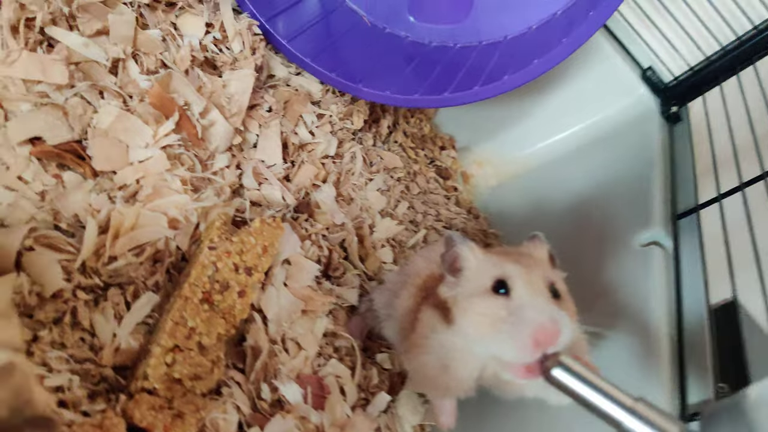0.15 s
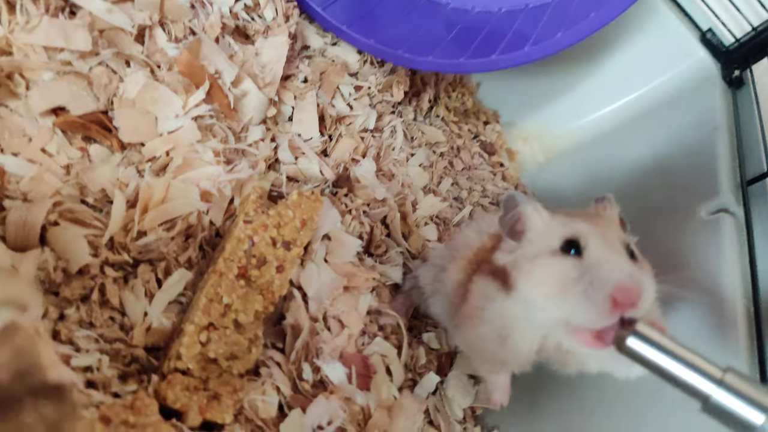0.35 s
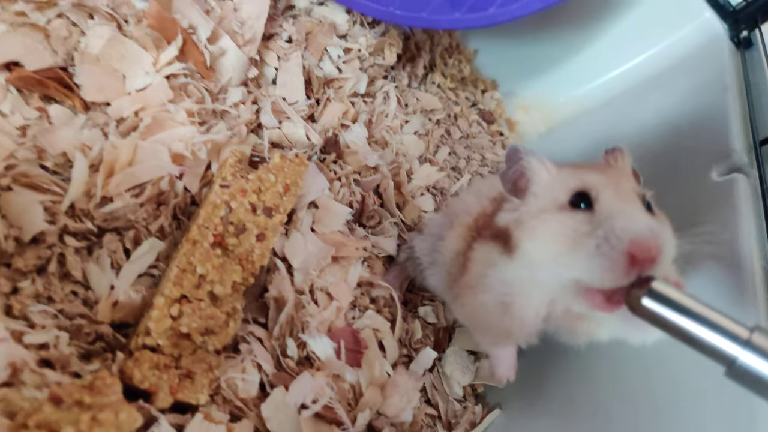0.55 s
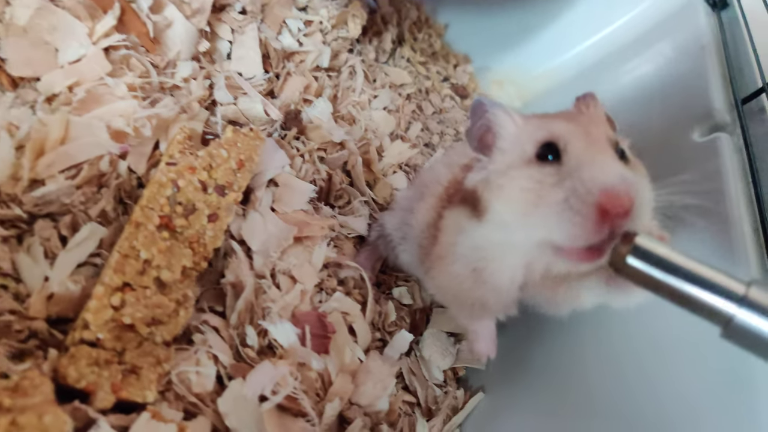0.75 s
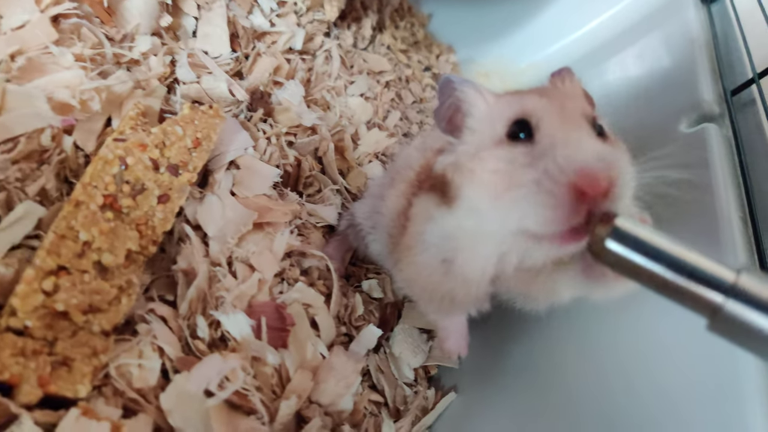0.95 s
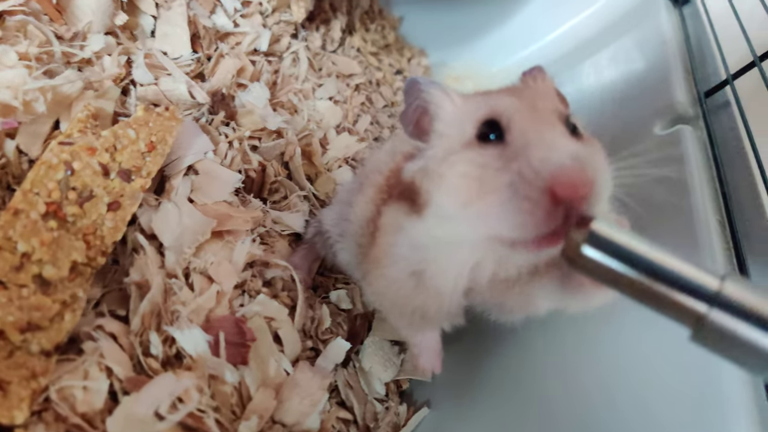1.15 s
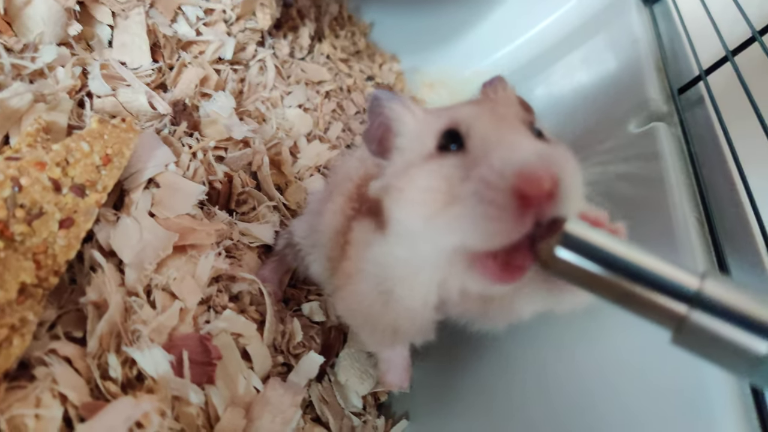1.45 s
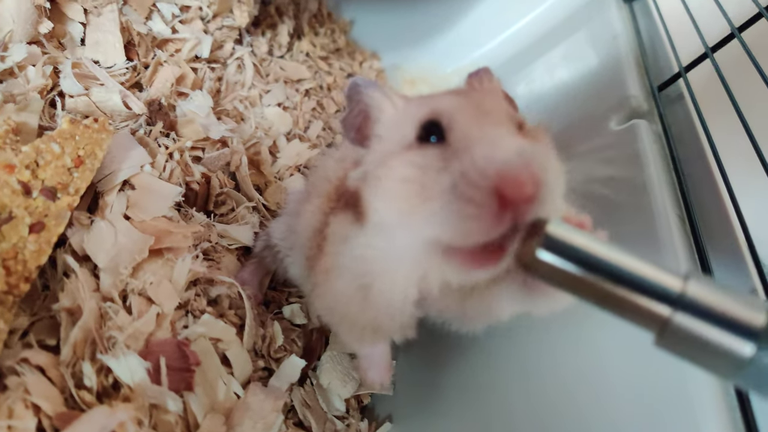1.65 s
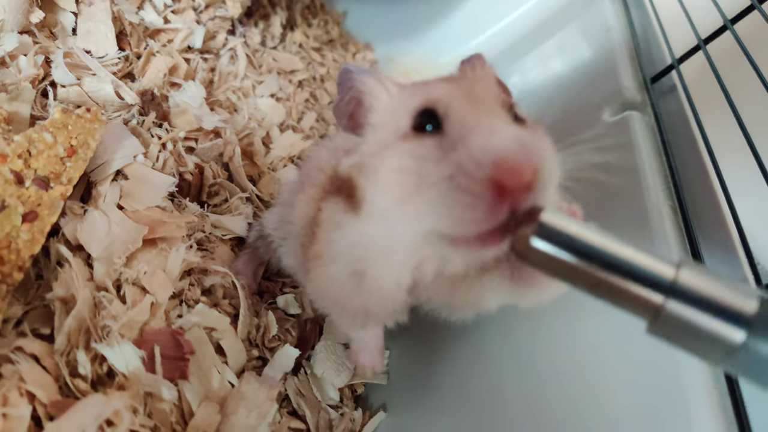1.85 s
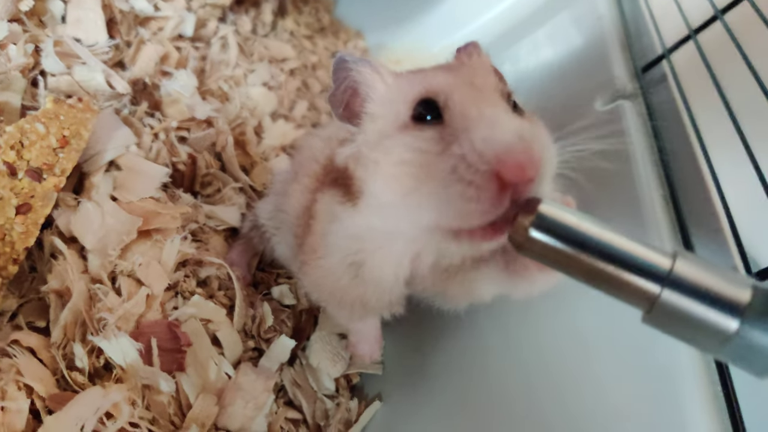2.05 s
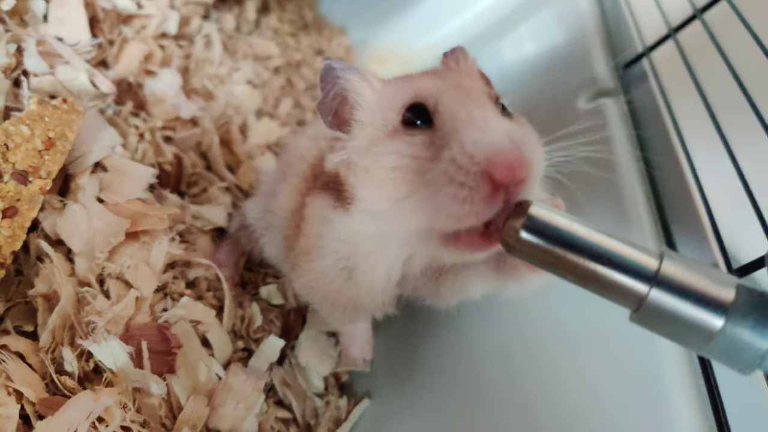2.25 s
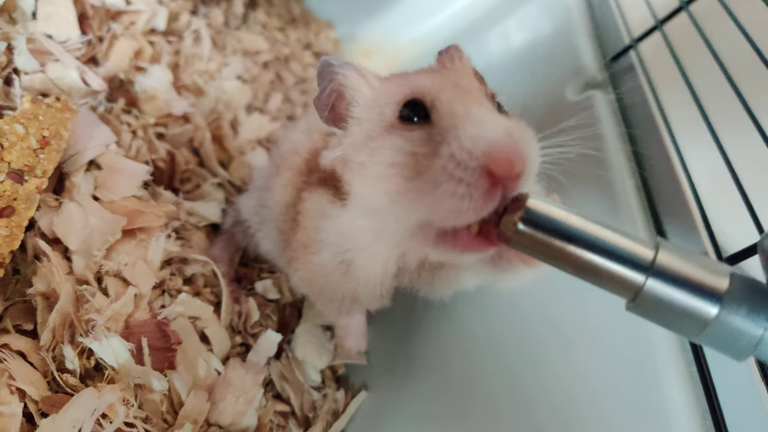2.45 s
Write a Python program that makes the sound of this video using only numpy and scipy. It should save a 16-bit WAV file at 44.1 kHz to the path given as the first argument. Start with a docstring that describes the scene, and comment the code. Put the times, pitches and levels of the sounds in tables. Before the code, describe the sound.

A hamster's steel water spout clicks twice in quick succession after a soft hiss and low handling rumble; faint bedding rustles and small wet snaps follow, heard close up in a quiet room.

```python
"""A hamster drinks from the steel spout of a bottle in its cage, close to a hand-held camera in a quiet room.
After a near-silent instant, filtered room noise with faint hums fades in; a soft noise hiss swells, peaking
near 0.5 s, over a push of air and hand rumble. Faint grain rustles and noise-burst knocks come and go.
Near 1.5 s the spout clacks twice: a noise crack, decaying sine modes of spout and cage, a rattle and a bar ring.
Small wet ticks, each a dying noise burst, follow near 1.9 s and later, among more rustles."""
import sys
import numpy as np
from scipy import signal
from scipy.fft import rfft, irfft
from scipy.io import wavfile
from scipy.ndimage import uniform_filter1d

SR = 44100
rng = np.random.default_rng(int(sys.argv[2]) if len(sys.argv) > 2 else 0)


def file_out(sig):
    """Save sig as 16-bit WAV at sys.argv[1]."""
    # one column per channel
    cols = np.atleast_2d(sig).T
    # limit, then scale
    lim = np.clip(cols, -1, 1)
    pcm = np.round(lim * 32767).astype(np.int16)
    wavfile.write(sys.argv[1], SR, pcm)


N = 114660
T, HZ = np.arange(N) / SR, np.fft.rfftfreq(N, 1 / SR)
T_HIT = T[:SR]  # 1 s for each struck sound

# In all tables left_minus_right_db > 0 is louder on the left; density_db is relative, per Hz.


def amp(db):
    """Decibels to gain."""
    return 10 ** (np.asarray(db) / 20)


def unit(x):
    """Scales to rms 1."""
    return x / np.sqrt(np.mean(x ** 2) + 1e-20)


def read(points, hz, axis=1):
    """Interpolates one table column along log frequency."""
    p = np.transpose(points)
    return np.interp(np.log(hz + 1), np.log(p[0] + 1), p[axis])


def level(points):
    """Gain over time from (time_s, level_db) points."""
    return amp(np.interp(T, *np.transpose(points)))


def sides(left_minus_right_db):
    """Left and right gains, of mean 1, for a level difference."""
    gains = amp([[left_minus_right_db / 2], [-left_minus_right_db / 2]])
    return gains / gains.mean()


def add(mix, start_s, sound):
    """Mixes a stereo sound in at a time."""
    part = mix[:, max(round(start_s * SR), 0):][:, :sound.shape[1]]
    part += sound[:, :part.shape[1]]


def colour(x, gain_db):
    """Filters by a gain per frequency; result has rms 1."""
    return unit(irfft(rfft(x) * amp(gain_db), N))


def noise():
    """White noise, unrelated on the two sides."""
    return rng.standard_normal((2, N))


def decay(t, t60_s):
    """Exponential fall of 60 dB in t60_s."""
    return np.exp(-np.log(1000) * t / t60_s)


def burst(start_s, decay_s, spectrum_db):
    """A dying puff of noise through a filter, starting at about level 1."""
    fade = (T >= start_s) * np.exp(-np.maximum(T - start_s, 0) / decay_s)
    return colour(noise() * fade, spectrum_db) * np.sqrt(np.mean(fade ** 2))


# steel spout modes: pitch_hz
SPOUT_PITCHES = [385, 900, 1080, 2085, 2250, 2520, 3020, 4090, 4200, 4760, 6615, 9720, 10300, 13420]
# the same modes in order: level_db, t60_s, left_minus_right_db
SPOUT_MODES = [(-3.5, 0.061, 5), (-3.5, 0.02, -26), (-0.5, .016, -0.5), (-12, 0.033, 3), (-4.5, 0.015, -29),
               (-11, 0.0064, -15), (-13, 0.015, -11), (-4.5, 0.027, -16), (-12.5, 0.015, -15),
               (-20, .06, 5), (-12, 0.055, -12), (-14, 0.017, -16), (-3, 0.0041, -10), (-14, .018, -11)]
LEFT_LAG_S = 0.000379


def tube(pitch_ratio):
    """Decaying sine modes of the steel spout, lagging in phase on the left."""
    lagged_t = T_HIT - np.array([[LEFT_LAG_S], [0]])
    ring = np.zeros((2, SR))
    for pitch_hz, (level_db, t60_s, balance_db) in zip(SPOUT_PITCHES, SPOUT_MODES):
        sine = np.sin(2 * np.pi * pitch_hz * pitch_ratio * lagged_t)
        ring += sides(balance_db) * amp(level_db) * decay(T_HIT, t60_s) * sine
    return ring


# spout reflections off the tub walls: delay_s, left_db, right_db
TUB_ECHOES = [(.0034, -15, -22), (.0062, -16, -24), (.0105, -25, -19), (.021, -27, -25)]


def with_echoes(direct):
    """Adds delayed copies of the right-hand ring, as the tub walls return it."""
    ring = direct.copy()
    for delay_s, left_db, right_db in TUB_ECHOES:
        add(ring, delay_s, amp([[left_db], [right_db]]) * direct[1])
    return ring


# dense rattle spectrum: freq_hz, density_db
RATTLE_SPECTRUM = [(60, 2), (250, -9.5), (420, 6), (690, -5.5), (1100, -4), (1750, -14.5), (2200, -17.5),
                   (3200, -18.5), (4200, -30.5), (7000, -17.5), (8600, -34), (10000, -28), (15000, -32)]
# rattle decay: freq_hz, t60_s
RATTLE_DECAY = [(100, 0.88), (500, 0.2), (1500, 0.088), (4000, 0.23), (14000, 0.098)]


def rattle():
    """Dense rattle: coloured noise with its own decay time at each frequency."""
    start = colour(noise(), read(RATTLE_SPECTRUM, HZ))[:, :SR]
    hz, frame_s, z = signal.stft(start, SR, nperseg=256)
    z = z * decay(frame_s, read(RATTLE_DECAY, hz)[:, None])
    return signal.istft(z, SR, nperseg=256)[1][:, :SR]


CRACK_DECAY_S, CRACK_BALANCE_DB = 0.00047, -37


def crack():
    """Contact crack: white noise dying at once, nearly all on the right."""
    return sides(CRACK_BALANCE_DB) * noise()[:, :SR] * np.exp(-T_HIT / CRACK_DECAY_S)


# cage and tub modes: pitch_hz, level_db, t60_s, left_minus_right_db
CAGE_MODES = [(76.4, -3, 0.18, 3), (101.2, 6, .2, 20), (138.9, 4, 0.23, 12.5), (227.6, -6, 0.17, 2),
              (259.4, -12.5, 0.25, 8), (334.4, -10.5, 0.41, 8), (425, -7, 0.15, -1), (468, -23, 0.16, 0),
              (446, -21.5, 2.3, 16), (452, -27, 1.7, 8), (572, -9, .15, -12), (604, -16, 0.18, 14),
              (655, -29, 1.6, 4), (1150, -16, .12, -2), (753.5, -15, 0.23, 23), (913, -9, 0.045, 7)]
CAGE_RISE_S = 0.0063


def thump():
    """Softly rising, decaying modes of cage and tub; side phases differ more at high pitch."""
    out = np.zeros((2, SR))
    for pitch_hz, level_db, t60_s, balance_db in CAGE_MODES:
        apart_cycles = np.array([[0], [(rng.random() - .5) * min(pitch_hz / 800, 1)]])
        sine = np.sin(2 * np.pi * (pitch_hz * T_HIT + apart_cycles))
        out += sides(balance_db) * amp(level_db) * decay(T_HIT, t60_s) * sine
    return (1 - np.exp(-T_HIT / CAGE_RISE_S)) * out


# spout clacks: start_s, level_db, lowpass_hz, thump_db, pitch_ratio
CLACK_EVENTS = [(1.494, -33, 4900, -45, 1), (1.5784, -30, 14300, -36, 1.0)]
RATTLE_DB, CRACK_DB = -8, -2  # relative to the clack


def spout():
    """Each clack low-passes tube ring, rattle and crack together, and thumps the cage."""
    out = np.zeros((2, N))
    for start_s, level_db, lowpass_hz, thump_db, pitch_ratio in CLACK_EVENTS:
        ring = with_echoes(tube(pitch_ratio))
        strike = ring + amp(RATTLE_DB) * rattle() + amp(CRACK_DB) * crack()
        contact = signal.butter(3, min(lowpass_hz, .45 * SR), fs=SR)
        add(out, start_s, amp(level_db) * signal.lfilter(*contact, strike))
        add(out, start_s, amp(thump_db) * thump())
    return out


# outline over the many cage bar modes: freq_hz, level_db
BAR_OUTLINE = [(300, 0), (450, 10.5), (700, -14), (1250, 0.5), (2300, -2.5), (3000, -16), (4500, -11)]
# beating cluster of wires: pitch_hz
WIRE_PITCHES = [3830, 3868, 3884, 3897, 3931, 3975]
BARS_DB, BARS_T60_S, BARS_TOP_HZ = -23.5, 1, 4503  # level relative to the clack
WIRES_DB, WIRES_T60_S, WIRES_BALANCE_DB = -45.5, 0.88, -8  # level relative to the clack


def ringing(pitch_hz):
    """A steady sine with a random phase on each side."""
    return np.sin(2 * np.pi * (pitch_hz * T_HIT + rng.random((2, 1))))


def bars():
    """The wire bars ring on faintly after each clack, with a beating cluster near 3.9 kHz."""
    out = np.zeros((2, N))
    pitches_hz = np.geomspace(300, BARS_TOP_HZ, num=60) * rng.uniform(.98, 1.02, 60)
    for start_s, clack_db, _, _, _ in CLACK_EVENTS:
        many = unit(sum(amp(read(BAR_OUTLINE, hz)) * ringing(hz) for hz in pitches_hz))
        cluster = sides(WIRES_BALANCE_DB) * sum(ringing(hz) for hz in WIRE_PITCHES)
        add(out, start_s, amp(clack_db + BARS_DB) * many * decay(T_HIT, BARS_T60_S))
        add(out, start_s, amp(clack_db + WIRES_DB) * cluster * decay(T_HIT, WIRES_T60_S))
    return out


# wet ticks at the spout: start_s, level_db, left_minus_right_db, decay_s
TICK_EVENTS = [(1.9250, -43, -27, 0.0012), (1.936, -55, -11, 0.00093), (1.9418, -57, -18, 0.0017),
               (2.022, -61.5, -21, 0.006), (2.081, -66, 16, 0.0028), (2.27, -62.5, -10, 0.0049)]
# tick spectrum: freq_hz, density_db
TICK_SPECTRUM = [(1500, -28), (3100, -3), (4300, -5), (5800, 0), (7200, -4.5), (8700, -24), (10200, -10),
                 (11400, 4.5), (12800, -14), (16000, -26)]


def ticks():
    """Tiny wet snaps of tongue and water: coloured noise bursts of a few milliseconds."""
    out = np.zeros((2, N))
    for start_s, level_db, balance_db, decay_s in TICK_EVENTS:
        out += amp(level_db) * sides(balance_db) * burst(start_s, decay_s, read(TICK_SPECTRUM, HZ))
    return out


# light taps on the cage:
# start_s, level_db, left_minus_right_db, resonance_hz, half_width_oct (7.5 dB down), decay_s
TAP_EVENTS = [(0.8331, -51.5, 6, 2620, 0.34, 0.0014), (.836, -59, 8, 2600, 0.36, 0.0018),
              (.8393, -62, 1, 2650, .28, 0.0039), (0.743, -65, 2, 820, .2, .0031),
              (1.842, -59.5, 13, 4520, 0.081, 0.0051), (1.845, -57, -18, 1050, .2, .005)]
TAP_SKIRT_DB = -34


def taps():
    """Faint short knocks on the cage: noise bursts, each around one resonance."""
    out = np.zeros((2, N))
    for start_s, level_db, balance_db, resonance_hz, half_width_oct, decay_s in TAP_EVENTS:
        octaves = np.log2((HZ + 1) / resonance_hz)
        shape_db = TAP_SKIRT_DB * (1 - np.exp(-(octaves / (2 * half_width_oct)) ** 2))
        out += amp(level_db) * sides(balance_db) * burst(start_s, decay_s, shape_db)
    return out


# rustles of bedding and fur: middle_s, sigma_s, level_db, left_minus_right_db, resonance_hz
RUSTLE_EVENTS = [(0.667, 0.0075, -64.5, 2, 4540), (0.838, 0.011, -64.5, 1, 2700),
                 (1.299, 0.012, -70.5, -8, 5130), (1.56, 0.05, -63.5, -9, 4370),
                 (1.805, 0.025, -61, -7.5, 6300), (1.846, 0.011, -64, 0, 4500),
                 (1.969, 0.017, -58.5, -6, 6560), (2.028, 0.064, -67, -2, 4730),
                 (2.083, 0.0099, -58, -3, 7000), (2.124, 0.048, -68, -12, 5350),
                 (2.489, 0.006, -70, 12, 4400), (2.538, 0.0076, -63, 1, 4500)]
# rustle spectrum: freq_hz, density_db
RUSTLE_SPECTRUM = [(500, 5.5), (1100, -1), (2200, 0.5), (4500, 0), (7300, -5), (8600, -3.5), (11500, -4),
                   (16000, -33)]
GRAINS_PER_S, GRAIN_SPREAD_DB = 4600, 3
RUSTLE_PEAK_DB, RUSTLE_PEAK_OCT = 7, 0.19


def rustles():
    """Bedding and fur: Gaussian swells of random fine grains, each swell with one resonance."""
    out = np.zeros((2, N))
    for middle_s, sigma_s, level_db, balance_db, resonance_hz in RUSTLE_EVENTS:
        hits = rng.random(N) < GRAINS_PER_S / SR
        strength = amp(GRAIN_SPREAD_DB * np.minimum(rng.exponential(1, N), 4))
        grains = hits * strength * noise()
        octaves = np.log2((HZ + 1) / resonance_hz)
        peak_db = RUSTLE_PEAK_DB * np.exp(-(octaves / RUSTLE_PEAK_OCT) ** 2)
        coloured = colour(grains, read(RUSTLE_SPECTRUM, HZ) + peak_db)
        swell = np.exp(-.5 * ((T - middle_s) / sigma_s) ** 2)
        out += amp(level_db) * sides(balance_db) * coloured * swell
    return out


# rumble of the hand holding the camera: time_s, level_db
RUMBLE_LEVEL = [(.18, -94), (.24, -57), (.42, -61), (.62, -54), (1.35, -57.5), (1.6, -45), (1.88, -55.5),
                (2.1, -62), (2.35, -50), (2.6, -49)]
# rumble spectrum: freq_hz, density_db
RUMBLE_SPECTRUM = [(15, 14.5), (45, 3), (80, 6.5), (125, 0.5), (240, -25.5), (400, -11), (1200, -45)]
RUMBLE_BALANCE_DB, RUMBLE_APART = 6, .4  # apart: gain of the noise unrelated between sides


def rumble():
    """Soft low rumble of the holding hand: noise mostly shared by both sides."""
    mostly_shared = noise()[0] + RUMBLE_APART * noise()
    return sides(RUMBLE_BALANCE_DB) * colour(mostly_shared, read(RUMBLE_SPECTRUM, HZ)) * level(RUMBLE_LEVEL)


PUSH_PEAK_S, PUSH_RISE_S, PUSH_FALL_S = 0.28, 0.06, 0.18
PUSH_DB, PUSH_BALANCE_DB = -30.5, 18


def push():
    """One slow pressure pulse of air, mostly on the left, as the camera starts to move."""
    slope_s = np.where(T < PUSH_PEAK_S, PUSH_RISE_S, PUSH_FALL_S)
    return sides(PUSH_BALANCE_DB) * amp(PUSH_DB) * np.exp(-((T - PUSH_PEAK_S) / slope_s) ** 2)


# hiss as the camera moves in: time_s, level_db
HISS_SWELL = [(.03, -103.5), (.05, -68.5), (.17, -67), (.27, -61), (.48, -58.5), (.66, -62.5), (.85, -67),
              (1.15, -71.5), (1.4, -72)]
# hiss spectrum: freq_hz, left_density_db, right_density_db
HISS_SPECTRUM = [(610, 0, 8), (1480, 8, 2.5), (2400, -5, 2), (4460, 0.5, -2.5), (6340, -8.5, 1),
                 (7180, -10, 5.5), (8330, -1, -23), (11600, -15, -3.5), (15300, -6.5, -40)]


def hiss():
    """A soft rubbing hiss: swelling noise with its own spectrum on each side."""
    spectrum_db = np.array([read(HISS_SPECTRUM, HZ, axis=1), read(HISS_SPECTRUM, HZ, axis=2)])
    return colour(noise(), spectrum_db) * level(HISS_SWELL)


# room noise spectrum: freq_hz, density_db
ROOM_SPECTRUM = [(8, -2), (25, -7.5), (50, -30.5), (85, -14), (112, -14), (165, -13.5), (200, -13.5),
                 (268, -17), (355, -22), (443, -22), (540, -25), (713, -25), (942, -23.5), (1400, -26.5),
                 (2240, -37), (4500, -46.5), (8310, -47.5), (11000, -44), (15800, -41.5)]
# room noise balance: freq_hz, left_minus_right_db
ROOM_SIDES = [(60, -20), (150, 13.5), (380, 2), (950, 1.5), (2380, 2.0), (5980, -1), (15000, 3)]
# room noise likeness of the sides: freq_hz, correlation
ROOM_CORRELATION = [(60, 0.58), (180, 0.75), (550, 0.29), (1650, -0.19), (4970, -0.17), (15000, 0.044)]
ROOM_DB, PATCH_DB = -58.5, 2  # room level before its fade


def air():
    """Coloured room noise with partly alike sides and faint drifting patches in time and frequency."""
    hz, _, z = signal.stft(noise(), SR, nperseg=2048, noverlap=1536)
    same = np.clip(read(ROOM_CORRELATION, hz), -1, 1)[:, None]
    z = np.array([z[0], same * z[0] + np.sqrt(1 - same ** 2) * z[1]])
    patches = uniform_filter1d(rng.standard_normal(z.shape[1:]), size=24, axis=0)
    patches = unit(uniform_filter1d(patches, size=7, axis=1))
    half_db = read(ROOM_SIDES, hz)[:, None] / 2
    lean = amp([half_db, -half_db])
    z = z * lean / lean.mean(0) * amp(read(ROOM_SPECTRUM, hz)[:, None] + PATCH_DB * patches)
    x = signal.istft(z, SR, nperseg=2048, noverlap=1536)[1][:, :N]
    return amp(ROOM_DB) * x / x.mean(0).std()


# room hums: pitch_hz, width_hz (6 dB down), level_db (left, before the room's fade)
ROOM_HUMS = [(80.1, 3.7, -63.5), (203.5, 5.8, -65), (271.3, 12, -68.5), (887, 45, -76)]
HUM_RIGHT_DB = -11


def hums():
    """Unsteady hums: noise through narrow resonances, weaker on the right."""
    mono = np.zeros(N)
    for pitch_hz, width_hz, level_db in ROOM_HUMS:
        resonance = 1 / (1 + (2 * (HZ - pitch_hz) / width_hz) ** 2)
        mono += amp(level_db) * unit(irfft(rfft(rng.standard_normal(N)) * resonance, N))
    return mono * amp([[0], [HUM_RIGHT_DB]])


# room fade: time_s, level_db
ROOM_FADE = [(.03, -72.5), (.039, -4), (.1, -8), (.19, 3.5), (.28, 6), (.42, 8.5), (.62, 5.5), (1.0, 3),
             (1.42, 3), (1.7, 7.5), (1.9, 6.5), (2.2, 4.5), (2.6, 4.5)]


def room():
    """Low room noise and hums under one level curve."""
    return (air() + hums()) * level(ROOM_FADE)


def scene():
    """All sources at the microphones."""
    return spout() + bars() + ticks() + taps() + rustles() + rumble() + push() + hiss() + room()


# microphone port notch: freq_hz, gain_db
PORT_NOTCH = [(7400, 0), (8200, -3), (8900, -5), (9300, -3), (9600, 0)]
BAND_EDGE_HZ = 16000


def record(dry):
    """The microphone ports' notch, then a low-pass band limit."""
    size = N + SR  # padded against wrap-around
    port = amp(read(PORT_NOTCH, np.fft.rfftfreq(size, 1 / SR)))
    x = irfft(rfft(dry, size) * port, size)[:, :N]
    lowpass = signal.firwin(511, BAND_EDGE_HZ, window=("kaiser", 9), fs=SR)
    return signal.oaconvolve(x, lowpass[None], "same")


dry = scene()
out = record(dry)
file_out(out)
```